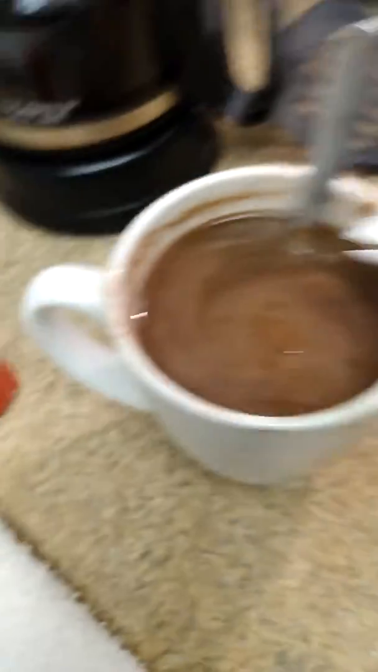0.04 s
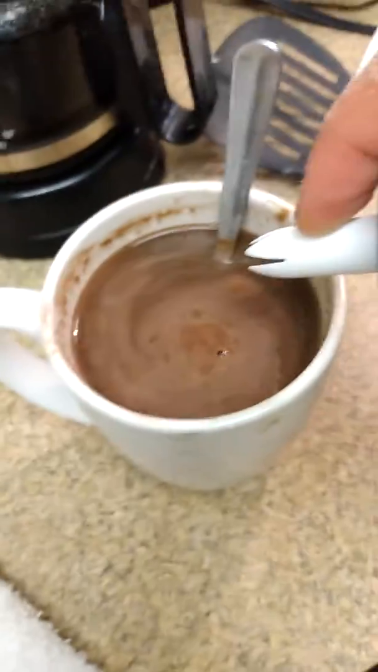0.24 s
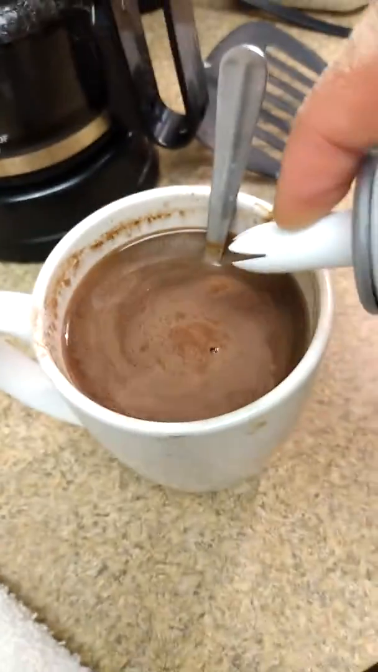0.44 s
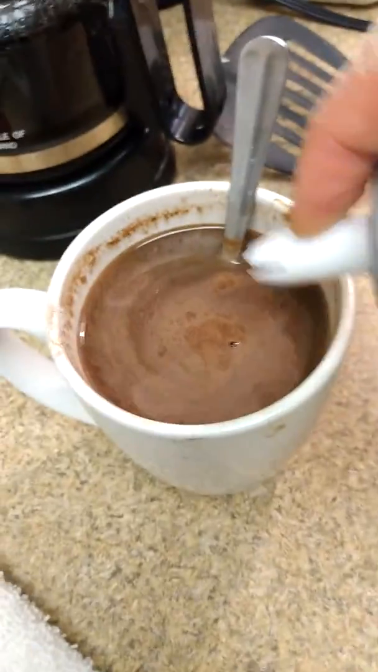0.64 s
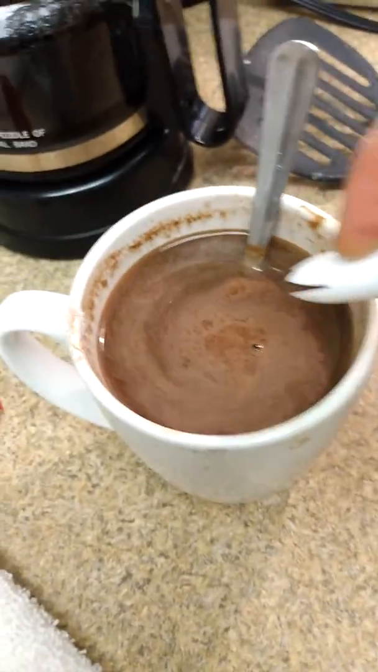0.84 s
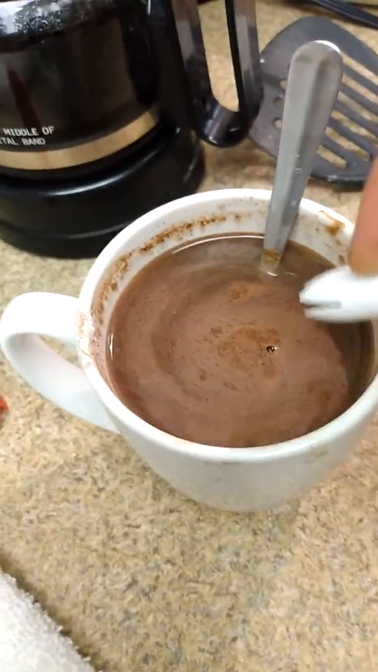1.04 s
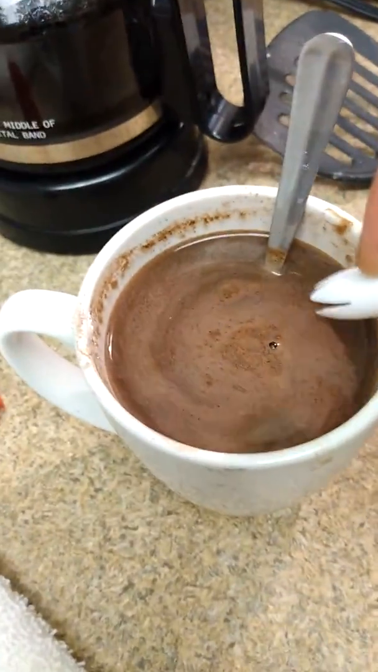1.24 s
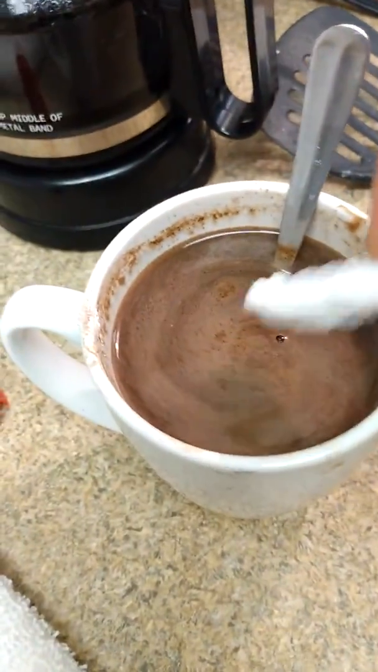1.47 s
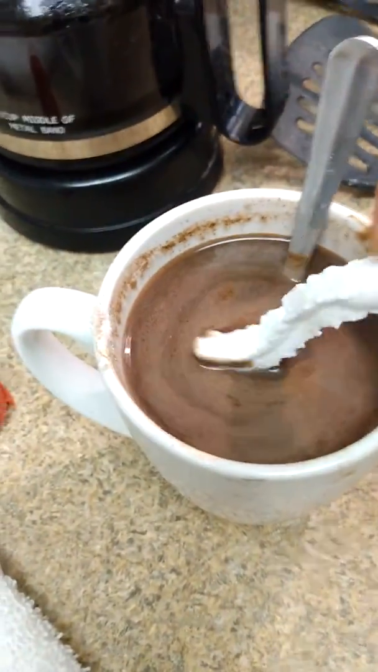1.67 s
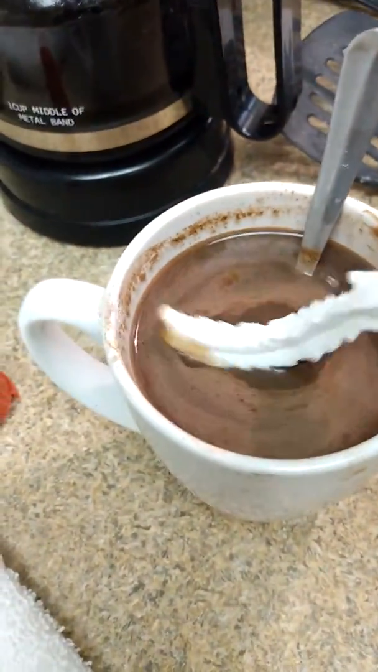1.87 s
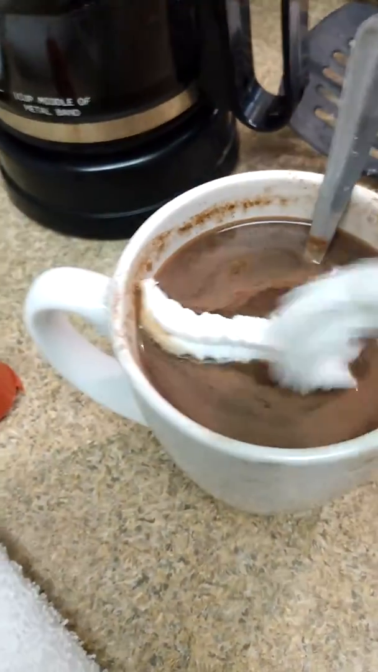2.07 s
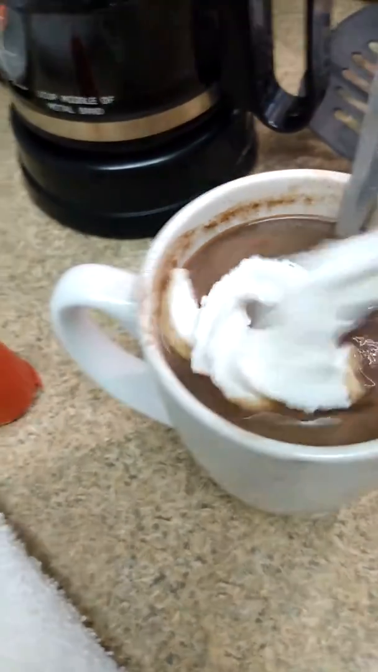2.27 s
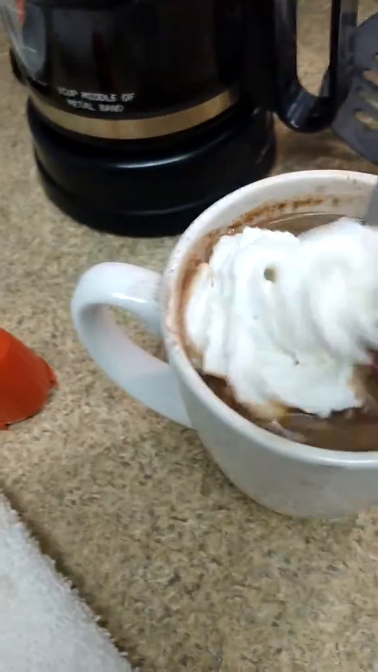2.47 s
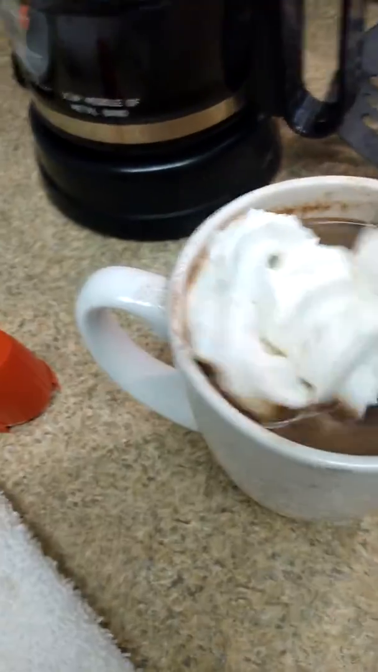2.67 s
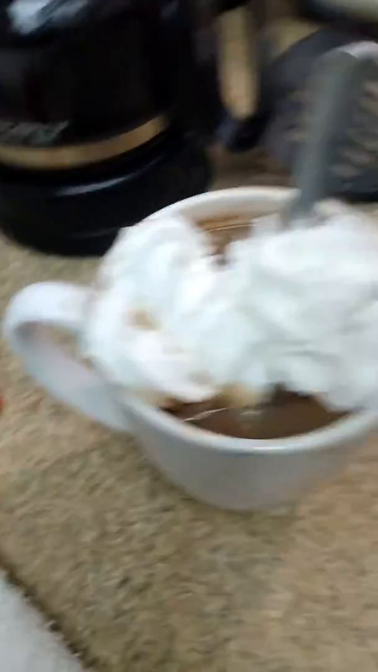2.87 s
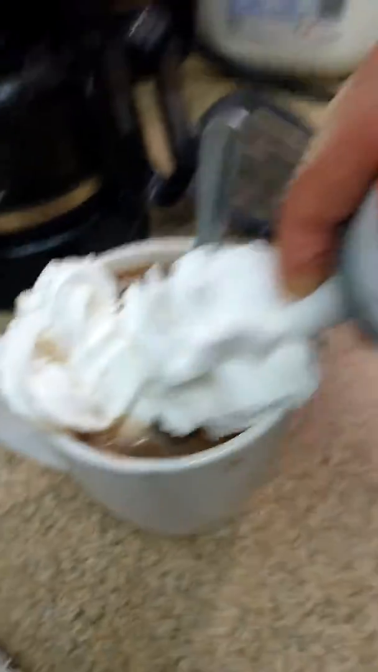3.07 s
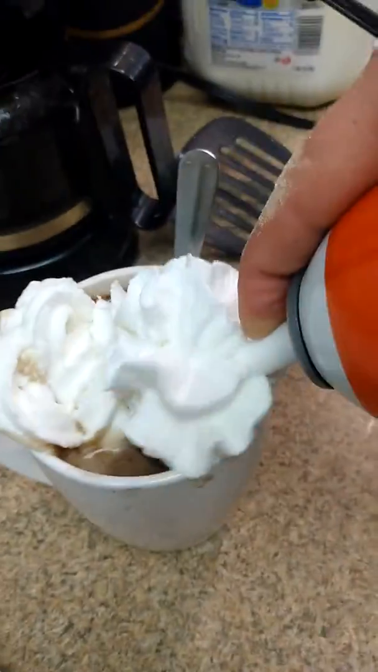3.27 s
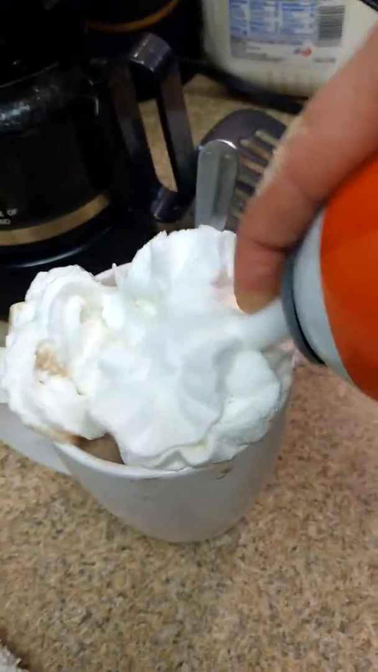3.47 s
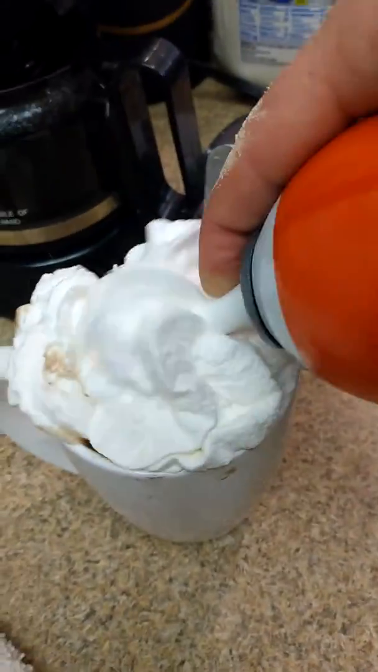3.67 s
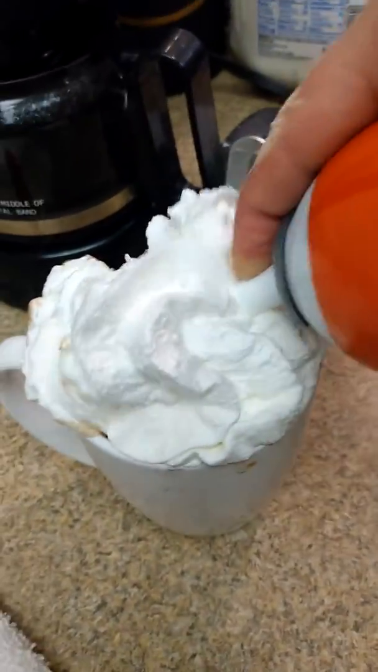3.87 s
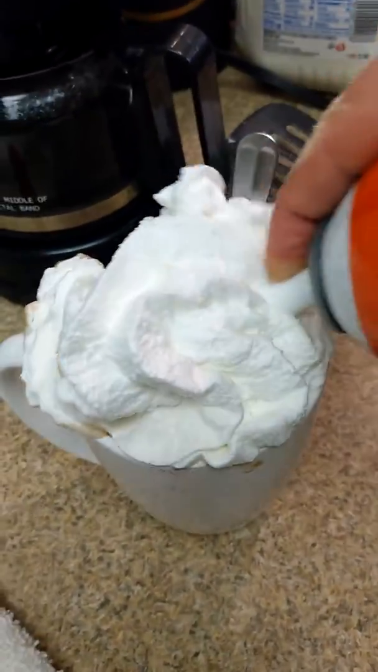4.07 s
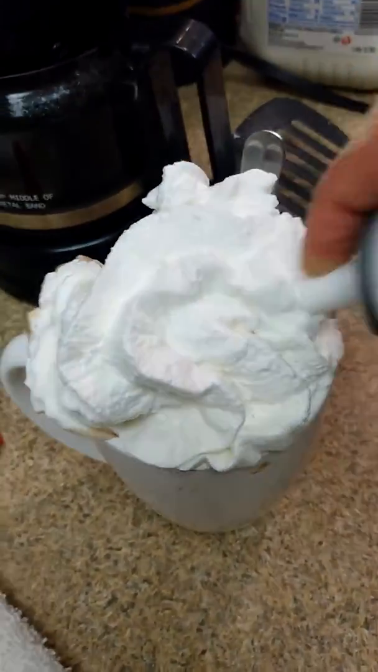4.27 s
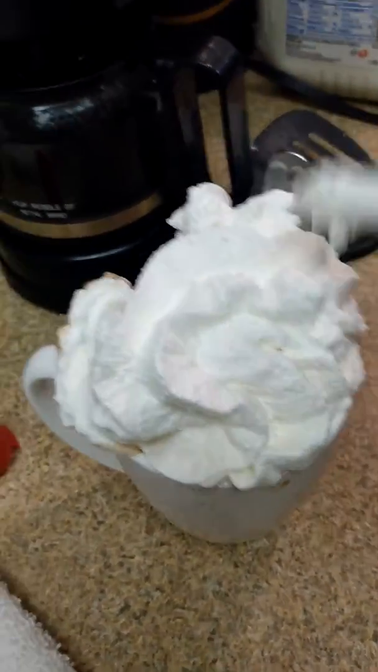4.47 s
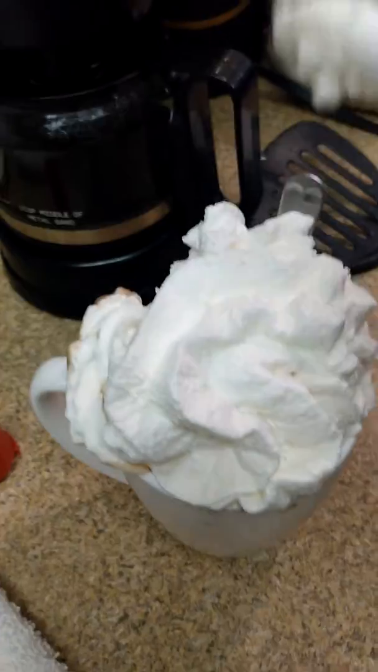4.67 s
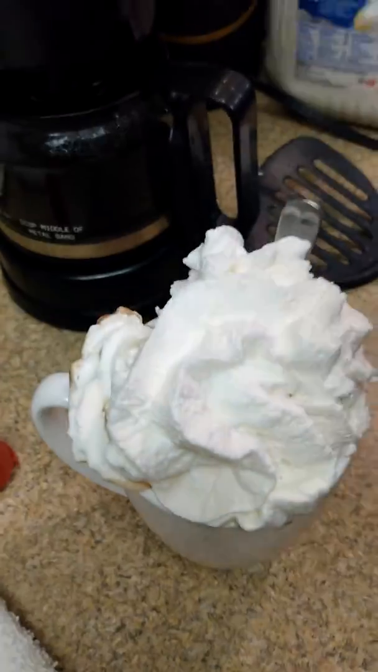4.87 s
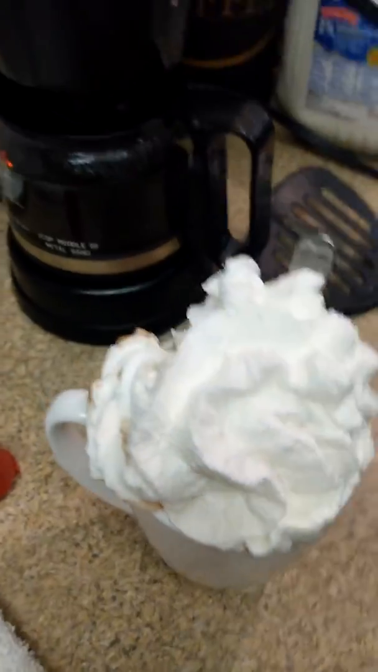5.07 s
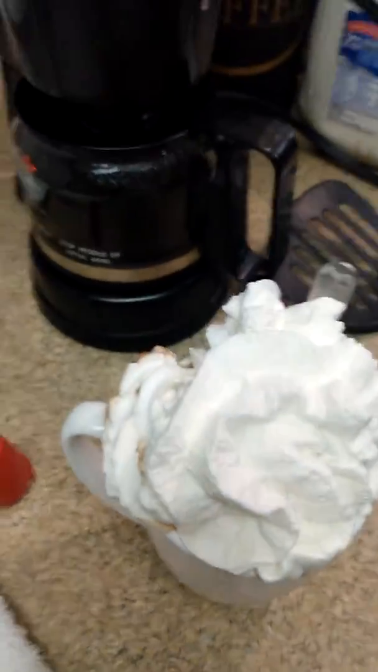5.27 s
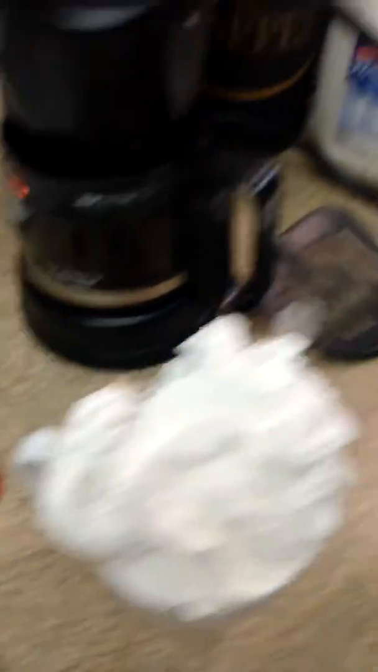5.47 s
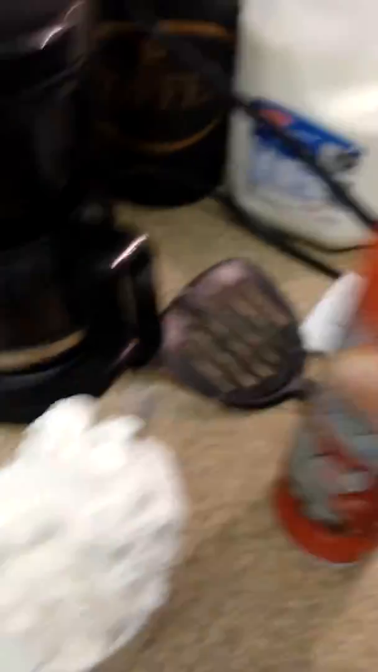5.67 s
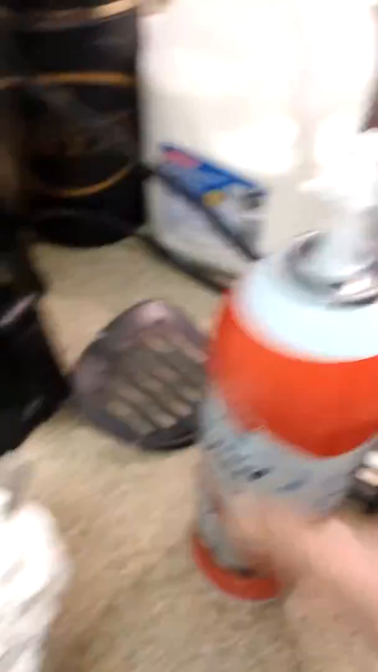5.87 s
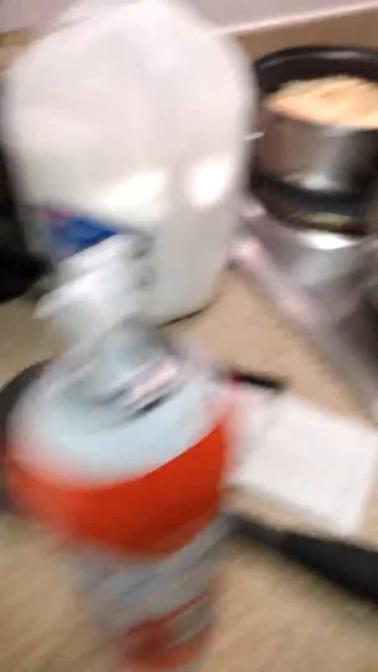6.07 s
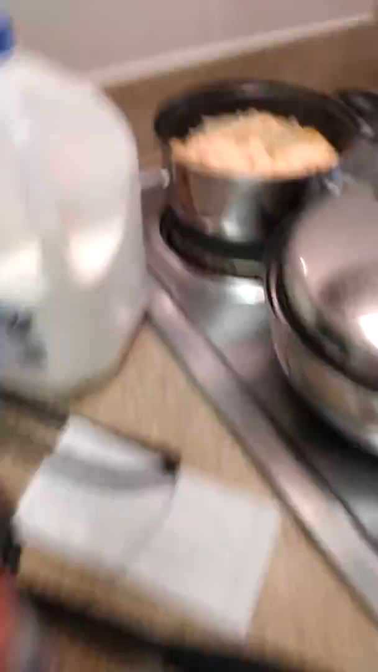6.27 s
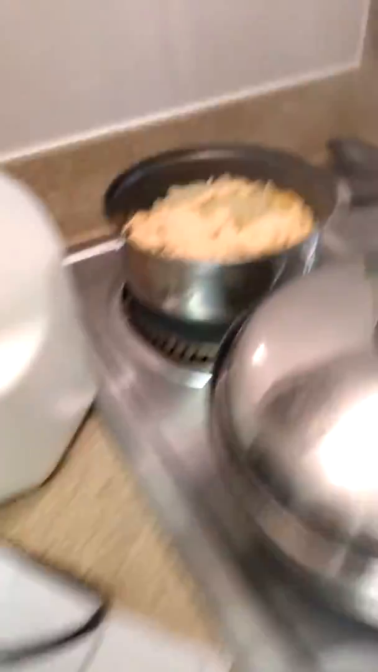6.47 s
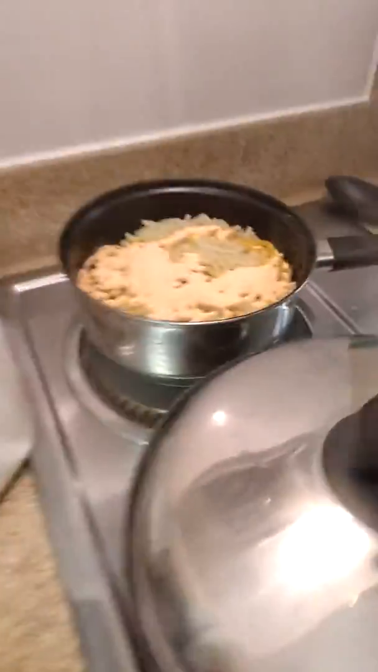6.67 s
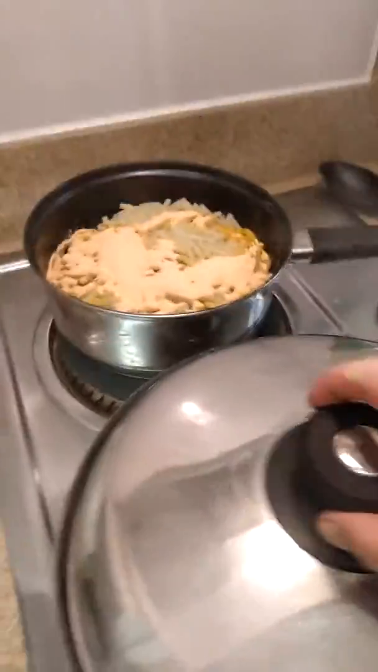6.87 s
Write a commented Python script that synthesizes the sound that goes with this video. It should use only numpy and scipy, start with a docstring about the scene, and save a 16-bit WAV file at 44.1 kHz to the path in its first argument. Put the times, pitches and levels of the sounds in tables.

```python
"""An appliance hums behind as fingers rub and bump an aerosol can of cream in a small kitchen.
The bent nozzle creaks, gas sputters, then foam hisses and crackles onto a mug and turns gassier: shaped noise.
Bursts of noise make the spits; moving resonances make the hollow gurgle of the cream.
A sleeve swishes in rubbed noise, then the can is set down and rocks: fading tones of can and counter.
Fingers brush the can again at the end. Two microphones of a hand-held phone hear it all."""
import sys
import numpy as np
from scipy import signal
from scipy.fft import rfft, irfft
from scipy.io import wavfile
from scipy.ndimage import uniform_filter1d

SR = 44100
rng = np.random.default_rng(int(sys.argv[2]) if len(sys.argv) > 2 else 0)


def transcribe(signal):
    """Save signal, clipped to [-1, 1], as a 16-bit WAV file at the path in sys.argv[1]."""
    frames = np.atleast_2d(signal).T
    limited = np.clip(frames, -1, 1)
    pcm = np.round(limited * 32767).astype(np.int16)
    wavfile.write(sys.argv[1], SR, pcm)


N = 306054
TIME = np.arange(N) / SR  # seconds
FREQS = np.maximum(np.arange(4097) * SR / 8192, 1)  # Hz, where every filter is drawn

# All levels are relative: mixing, echoes and filters still change them.

# Room tone. Each row: frequency in Hz, level in dB per Hz.
ROOM_TONE = [(25, -22.5), (60, -12), (85, -11), (110, 0), (160, -13.5), (215, -1), (300, -8.5), (450, -7),
             (620, -18.5), (1300, -22.5), (2100, -31.5), (3200, -35), (7500, -38), (16000, -39)]
# Appliance hum. Each row: frequency in Hz, level in dB.
HUM = [(101, -85), (120, -75.5), (241, -86.5)]
KITCHEN_T60_S = 0.28  # time for the room's tail to fall by 60 dB
# Typical delays of the echoes off mug, counter and coffee pot, in seconds.
ECHO_S = [0.000703, 0.0013, .0031]
TOP_HZ = 15950  # the phone keeps almost nothing above this

# The can lands and rocks on its rim. Each row: start in seconds, clunk of the can in dB,
# brightness of the contact in Hz, thud of the counter in dB.
KNOCKS = [(5.492, -8.5, 2570, -3), (5.4965, -6.5, 480, 0), (5.5093, -14.5, 2020, -6),
          (5.5222, -24, 2400, -20), (5.655, -10.5, 3180, -2), (5.6603, -18.5, 1500, -19),
          (5.6715, -22, 2000, -19), (5.688, -22.5, 1300, -12.5), (5.777, -23.5, 1800, -14),
          (5.783, -16, 460, -13), (5.931, -45, 700, -23), (5.939, -34.5, 1100, -26),
          (5.965, -34, 646, -29.5), (6.008, -45.5, 517, -45)]
# Short tones of the can's base, damped by the cream. Each row: pitch in Hz, level in dB,
# time to fall by 60 dB in seconds.
CAN_BASE = [(409, 1, 0.039), (742, 1.5, 0.027), (990, -6, .035), (1216, -11, 0.039), (1490, -11.5, 0.042),
            (1700, -11, .03), (2070, -14.5, 0.035), (3470, -26, 0.073), (3904, -22, 0.078)]
# Tones of the counter with the can on it. Each row: pitch in Hz, level in dB,
# time to fall by 60 dB in seconds.
COUNTER = [(102, -25, 0.2), (124.4, -23.5, 0.24), (206, -21.5, .24), (257, -23, 0.34), (324.5, -22.5, 0.23),
           (393, -32.5, 0.21), (432.5, -23, 0.36), (590, -34, 0.208), (720, -33.5, .18), (745, -31.5, .2),
           (800, -35.5, .18), (980, -26, 0.099), (1075, -42, .2), (1285, -37, .19), (1460, -37, 0.18),
           (1686, -40.5, .17), (1790, -41.5, .2), (2145, -40.5, .18)]
# Spectrum of the short rattle of each knock. Each row: frequency in Hz, level in dB.
CLATTER = [(25, -30.5), (60, -17.5), (110, -2), (160, -8), (220, 1.5), (400, -6), (540, -9), (780, -8.5),
           (1200, -17.5), (1800, -24.5), (2600, -27), (4500, -30), (8000, -41), (16000, -47.5)]
# how fast the rim bites, and how slowly the counter takes up the blow
CONTACT_S, COUNTER_SWELL_S = 0.0012, .005
# spread of tone level (dB) and pitch (share) between touches, and unevenness of the rattle (dB)
STRIKE_SCATTER_DB, STRIKE_DETUNE, RATTLE_DB = 1.5, .012, 3

# The hand bumps and shifts on the can. Each row: start in seconds, level in dB, length in seconds,
# brightness of the contact in Hz, thump of the palm in dB.
BUMPS = [(0.317, -39.5, 0.0043, 1300, -1), (0.333, -35, 0.0089, 1490, -7),
         (0.362, -44.5, 0.0076, 2200, -12), (0.389, -42, 0.0068, 1800, -12),
         (0.424, -46.5, 0.0061, 2000, -10), (0.437, -43.5, 0.0087, 500, -7), (0.49, -54, 0.013, 447, -22),
         (0.53, -61.5, 0.049, 300, -32), (0.663, -53, 0.008, 500, -27), (0.68, -41.5, 0.0093, 2980, -16),
         (0.956, -53, 0.011, 1100, -32), (1.006, -53, 0.0063, 250, -25)]
# Hollow resonances of the can in the hand. Each row: centre in Hz, width in Hz, level in dB.
CAN_BODY = [(474, 60, 6), (594, 44, -11.5), (720, 56, -4), (883, 51, 0.5), (1005, 32, -1.5),
            (1490, 150, -10.5), (1800, 64, -3.5), (1230, 1900, -11)]
PALM_HZ, PALM_WIDTH_HZ = 306, 166  # the dull thump of the palm
# unevenness of the bumping and bending fingers (dB), and how far a bump retunes the can (share of pitch)
JUDDER_DB, BUMP_DETUNE = 5, .025
# Cream squelches in the can and on the mound. Each row: start in seconds, level in dB,
# length in seconds, centre in Hz, width in Hz.
SQUELCHES = [(1.937, -55, 0.026, 333, 128), (1.99, -45.5, 0.008, 980, 980), (3.341, -44, 0.029, 563, 198),
             (3.409, -52.5, 0.022, 205, 90.5), (4.266, -60, 0.025, 300, 140),
             (4.475, -46.5, 0.0089, 700, 160)]
# Clicks and scuffs of the valve, fingers and things in reach. Each row: start in seconds, level in dB,
# length in seconds, centre in Hz, width in Hz.
TICKS = [(0.33, -34.5, 0.0031, 8300, 9400), (0.582, -54.5, 0.0016, 7060, 8860),
         (1.239, -23.5, 0.0026, 14000, 4000), (4.554, -53, 0.0058, 3600, 4000),
         (4.651, -46, 0.0021, 8800, 11300), (4.833, -50, 0.0043, 7900, 7000),
         (4.92, -41.5, 0.0055, 6600, 7140), (4.921, -47, 0.029, 1250, 1100),
         (5.209, -52.5, 0.0032, 7500, 4830), (5.296, -47, 0.0018, 9200, 3900),
         (5.491, -38, 0.0015, 7000, 9000), (5.508, -43, .0015, 8000, 8000),
         (5.638, -51, 0.0057, 3100, 2200), (5.655, -39, 0.0014, 6000, 8000),
         (5.673, -36, 0.00081, 8000, 8000), (5.778, -37.5, 0.0021, 6000, 8200),
         (5.817, -53.5, 0.038, 3270, 2400), (5.879, -43, .001, 8000, 7000),
         (5.936, -40, 0.00068, 8060, 7070), (6.156, -53, 0.0022, 6650, 6050), (6.37, -63, .009, 4500, 2500),
         (6.525, -58, 0.028, 680, 91), (6.631, -45.5, 0.019, 4590, 4400)]
# The finger bends the nozzle before the valve opens. Each row: time in seconds,
# level of the creak in dB, strain as a share of pitch.
BEND = [(1.101, -72, -.09), (1.112, -51, -0.073), (1.17, -49.5, 0), (1.225, -56.5, 0.024),
        (1.29, -71, 0.091)]
# Resonances of the bent nozzle. Each row: centre in Hz, width in Hz, level in dB.
BENT_NOZZLE = [(481, 56, 1.5), (664, 134, -2.5), (930, 230, -14), (1100, 80, -4)]
CREAK_LAG_S_PER_HZ = .00005  # higher resonances join later

# Fingers slide on metal. Each row: peak time in seconds, swell in seconds, fade in seconds,
# swish in dB, scrape in dB.
FINGER_STROKES = [(0.01, 0.09, 0.52, -73.5, -76.5), (0.34, 0.082, 0.15, -43, -54),
                  (0.71, 0.1, 0.088, -50, -69), (0.84, 0.55, 0.3, -74, -60),
                  (0.99, 0.19, 0.094, -55.5, -57.5), (1.21, 0.22, 0.36, -54.5, -57),
                  (5.86, 0.38, 0.23, -55, -57.5), (6.14, 0.084, .12, -71, -68.5),
                  (6.215, 0.06, 0.048, -56.5, -73), (6.66, 0.2, 0.29, -62.5, -62)]
# The sleeve brushes past. Each row: peak time in seconds, swell in seconds, fade in seconds,
# swish in dB, rasp in dB.
SLEEVE_STROKES = [(4.46, 0.036, 0.17, -53, -79), (4.655, 0.0065, 0.027, -65, -92),
                  (4.856, 0.035, 0.3, -48.5, -61), (4.935, 0.058, 0.14, -40, -44.5),
                  (5.18, 0.1, 0.19, -62, -95), (5.315, 0.035, 0.12, -65, -92.5),
                  (5.445, 0.035, 0.048, -69.5, -87), (6.47, 0.17, 0.42, -54, -75)]
# a stroke drops this much over its swell or fade time, ever faster away from the peak
STROKE_RANGE_DB, STROKE_CURVE = 25, 1.67
# Spectrum of the rubbing cloth. Each row: frequency in Hz, level in dB.
SWISH = [(2000, -58), (3600, -9), (5000, -1), (6600, -1), (9500, 1), (12000, -1), (16000, -12)]
# Resonances of the can's wall under the fingers. Each row: centre in Hz, width in Hz, level in dB.
SCRAPE = [(1747, 150, -11), (1978, 120, -2), (2203, 86, 0.5), (2400, 300, -9), (2980, 390, -7.5)]
# shifting fingers damp and retune the wall: level spread, share of pitch, changes per second
GRIP_DB, GRIP_SHARE, GRIP_PER_S = 3, .012, 9

# First gas through the empty nozzle. Each row: start in seconds, level in dB, length in seconds.
SPUTTER = [(1.2383, -27.5, 0.0023), (1.25, -40, 0.0007), (1.25, -27.5, 0.0028), (1.2646, -34.5, 0.0019),
           (1.269, -35, 0.0037), (1.281, -30.5, 0.004), (1.2905, -20.5, 0.00032), (1.292, -29, 0.0025),
           (1.301, -25.5, 0.0016), (1.307, -26, 0.0034), (1.3253, -39, 0.0007), (1.328, -29.5, 0.00065),
           (1.335, -31, 0.00063)]
# Resonances of the empty nozzle. Each row: centre in Hz, width in Hz, level in dB.
NOZZLE = [(1250, 710, -4), (1964, 280, 1), (3730, 490, 9), (4700, 600, 7.5), (6610, 770, 13.5),
          (11200, 2800, -2.5), (11900, 450, -9), (14000, 700, -10)]
# Flow through the valve, eased off once and pressed again. Each row: time in seconds,
# level of the spray in dB.
FLOW = [(1.332, -37.5), (1.36, -46), (1.43, -46.5), (1.5, -45.5), (1.646, -47), (1.69, -64), (1.82, -65),
        (1.93, -59.5), (2.05, -47.5), (2.45, -41), (2.87, -41), (3.05, -39), (3.32, -42), (4.37, -42),
        (4.42, -73)]
FULL_FLOW_DB = -45
# How much of the jet is free gas. Each row: time in seconds, smooth gas compared with bursting foam
# in dB, rush of the gas compared with the hiss in dB.
GAS = [(1.33, -21, -11), (1.5, 3, -14.5), (1.8, -42, -84), (2.15, -15, -19.5), (2.5, 2, -13),
       (3.1, 2.5, -5), (3.7, -2.5, -6.5), (4.35, 0.5, -5.5)]
# Spectrum of the foam's hiss. Each row: frequency in Hz, level in dB.
HISS = [(300, -74), (1500, -22.5), (3000, -32), (3900, -1), (5000, -1.5), (5900, 0.5), (6900, 3),
        (8200, 4.5), (9200, 1.5), (10700, 4.5), (12500, 1.5), (16000, -2.5)]
# Upper hiss, which swells as the jet spreads and drowns the slots. Each row: time in seconds,
# level in dB.
SIZZLE = [(1.35, -9), (2.1, -4), (2.7, -13.5), (3.1, -1.5), (3.45, -6), (3.9, -12.5), (4.35, -7)]
SIZZLE_HZ, SIZZLE_WIDTH_HZ = 9500, 3200
# the slots of the nozzle's tip sing, and stand out more at low flow
SLOTS_HZ, SLOTS_WIDTH_HZ, SLOTS_DB, SLOTS_DB_PER_DB = 6916, 690, -3.5, 0.3565
# Resonances of the cream-filled throat. Each row: centre in Hz, width in Hz, level in dB.
THROAT = [(1203, 274, 0), (1500, 325, 0), (1800, 346, 1.5)]
# the throat weakens below full flow, and is muffled once the cream piles up around it
THROAT_DB, THROAT_DB_PER_DB, BURIED_S, MUFFLE_DB_PER_S = -5.5, 1.1, 3.55, 10
# Gas blowing into the growing mound. Each row: time in seconds, level of its hollow in dB,
# pitch of the hollow in Hz.
HOLLOW = [(1.35, -13, 684), (1.6, -32, 700), (2.25, -22.5, 720), (2.8, -16, 700), (3.0, -9, 660),
          (3.36, -4.5, 656), (3.6, -9.5, 598), (3.8, -9, 696), (4.1, -9, 595), (4.35, -17, 664)]
# Resonances of the hollow in the cream. Each row: multiple of its pitch, width in Hz, level in dB.
HOLLOW_MODES = [(1, 306, -2), (1.499, 420, 0.5), (2.2, 800, -0.5)]
OPEN_HOLLOW_HZ = 698  # the throat has its listed pitches when the hollow has this one
# wet cream makes throat and hollow gurgle: depth, changes per second
GURGLE_DB, GURGLE_PER_S = 2.2, 57
# passing cream retunes them: share of pitch, changes per second
WANDER_SHARE, WANDER_PER_S = .045, 14
# Gas pockets, strong and weak, that burst at the nozzle at set times. Each row: start in seconds,
# level in dB.
SPITS = [(1.3618, -24), (1.4052, -20), (1.4864, -12.5), (1.5199, -19), (1.5693, -16), (1.6002, -27),
         (1.6187, -17.5), (1.636, -31), (1.7349, -24.5), (1.8517, -31.5), (1.876, -28), (1.937, -23.5),
         (1.957, -25.5), (1.977, -29), (2.0782, -20.5), (2.153, -28), (2.1655, -17), (2.2213, -17),
         (2.2513, -18), (2.2665, -26), (2.568, -14.5), (2.973, -11.5), (3.83, -21), (3.8784, -15.5),
         (4.047, -17)]
# pockets at random times: level over the flow before the spits' shared cut, and its weakening with time
POCKET_DB, POCKET_FADE_DB_PER_S = 15, 4.5
POCKETS_PER_S, POCKET_SCATTER_DB = 90, 5  # average rate, spread either way
# Place of the nozzle. Each row: time in seconds, left minus right in dB (before the phone's shading).
AIM = [(1.35, 3), (1.6, 5.5), (2.4, 5.5), (3.1, 3), (4.3, 2.5)]
# The phone's body shades the right microphone from the nozzle. Each row: frequency in Hz, level in dB.
SHADE = [(350, 6.5), (700, 8), (1300, -1), (8000, 0), (11000, -1), (15000, -2)]
PORT_LAG_S = .000185  # the spray reaches the right microphone about this much later
JET_ALIKE_HZ = 6000  # the close jet sounds alike at both microphones below this


def undb(db):
    """Turn decibels into a gain."""
    return 10 ** (np.asarray(db) / 20)


def unit(x):
    """Scale a sound to an average (rms) level of 1."""
    return x / np.sqrt(np.mean(x ** 2))


def curves(table):
    """Draw each column of a table as a line through time."""
    s, *columns = np.transpose(table)
    return [np.interp(TIME, s, c) for c in columns]


def during(table, fade=0.019):
    """Give 1 while a table lasts, fading outside it."""
    inside = np.minimum(TIME - table[0][0], table[-1][0] - TIME)
    return np.clip(1 + inside / fade, 0, 1)


def convolve(x, response):
    """Pass a mono or stereo sound through an impulse response."""
    if x.ndim == 2:
        response = np.atleast_2d(response)
    return signal.oaconvolve(x, response, axes=-1)[..., :x.shape[-1]]


def shaped(x, gain):
    """Filter with the given gain at FREQS, without any sound arriving early (minimum phase)."""
    cepstrum = irfft(np.log(gain + 1e-6))
    half = len(gain) - 1
    fold = np.r_[1, np.full(half - 1, 2), 1, np.zeros(half - 1)]
    return convolve(x, irfft(np.exp(rfft(cepstrum * fold))))


def colour(x, points):
    """Filter by a spectrum of (Hz, dB) points."""
    hz, db = np.transpose(points)
    return shaped(x, undb(np.interp(np.log(FREQS), np.log(hz), db)))


def peak(hz, width):
    """Gain of a steep-sided resonance."""
    return 1 / (1 + ((FREQS ** 2 - hz ** 2) / (FREQS * width * np.pi / 2)) ** 2)


def resonate(x, hz, width):
    """Pass a sound through a steep resonance whose centre may move; rms 1."""
    turn = np.exp(2j * np.pi * np.cumsum(hz) / SR)
    band = signal.butter(3, width / 2, fs=SR, output="sos")
    # shift the centre down to zero, keep what is near it, shift back
    return unit((signal.sosfilt(band, x * turn.conj()) * turn).real)


def noise(size=N):
    """White noise."""
    return rng.standard_normal(size)


def walk(rate, size=N):
    """Smooth random wander with average (rms) size 1."""
    k = max(int(SR / rate), 1)
    steps = np.repeat(noise(size // k + 1), k)
    return unit(uniform_filter1d(steps, k)[:size])


def grains(rate, spread_db):
    """Tiny clicks at random moments, a few much larger than the rest."""
    size = undb(spread_db * np.minimum(rng.exponential(size=N), 4))
    return unit((rng.random(N) < rate / SR) * size * np.sign(noise()))


def diffuse(size, alike_hz=480):
    """Noise scattered by the things on the counter: most alike at the two microphones in the bass."""
    alike = .95 / (1 + (FREQS / alike_hz) ** 3)
    mid = shaped(noise(size), np.sqrt((1 + alike) / 2))
    side = shaped(noise(size), np.sqrt((1 - alike) / 2))
    return np.array([mid + side, mid - side])


def puff(length, gain, rough_db=0, alike_hz=480):
    """A stereo noise burst that swells for `length` s and dies away; a rough one is broken up."""
    age = TIME[:SR // 4] / length
    swell = age * np.exp(1 - age)
    judder = undb(rough_db * walk(300, size=len(age)))
    burst = shaped(diffuse(len(age), alike_hz) * swell * judder, gain)
    return unit(burst) * np.sqrt(np.mean(swell ** 2))


def add(track, s, sound):
    """Mix a stereo sound into a track at time s."""
    i = int(s * SR)
    track[:, i:i + sound.shape[1]] += sound[:, :N - i]


def kitchen(x, room_db):
    """Add the short tail of the small room: noise that dies away."""
    t = TIME[:SR // 2]
    tail = diffuse(len(t)) * undb(-60 * t / KITCHEN_T60_S) * (t > .004)
    tail = unit(tail) / np.sqrt(len(t))
    return (x + undb(room_db) * convolve(x, tail)) / np.hypot(1, undb(room_db))


def glancing(x, echo_db, drift=0.043):
    """Nearby hard surfaces return echoes whose delays drift as the hand moves, combing the sound."""
    out = x.copy()
    for channel, sound in enumerate(x):
        for delay in ECHO_S:
            lag = delay * (rng.uniform(.8, 1.24) + drift * walk(1.2))
            out[channel] += undb(echo_db) * np.interp(TIME - lag, TIME, sound)
    return out / np.sqrt(1 + len(ECHO_S) * undb(echo_db) ** 2 / 2)


def room_tone():
    """Moving air is noise whose level wavers; the appliance hums in steady sine tones."""
    air = unit(colour(diffuse(N, alike_hz=800), ROOM_TONE)) * undb(-71.0 + 0.19 * walk(3.5))
    hum = sum(undb(db) * np.sqrt(2) * np.sin(2 * np.pi * hz * TIME) for hz, db in HUM)
    return air + hum


def ringing(modes, scatter_db, detune):
    """Fading tones as rows; each touch varies their levels and pitches at random, low pitches least."""
    t = TIME[:SR // 2]
    hz, db, t60 = np.transpose(modes)
    hz = hz * (1 + detune * hz / hz.max() * noise(len(hz)))
    db = db + scatter_db * noise(len(hz))
    sign = (-1) ** np.arange(len(hz))
    level = undb(db[:, None] - 60 * t / t60[:, None])
    return sign[:, None] * level * np.exp(2j * np.pi * hz[:, None] * t)


def heard(modes):
    """Struck tones at both microphones: short waves arrive out of step."""
    phase = noise((2, len(modes))) * (np.transpose(modes)[0] / 1500) ** 2
    return (np.exp(1j * phase) @ ringing(modes, STRIKE_SCATTER_DB, STRIKE_DETUNE)).imag


def knocks():
    """Each touch of the rim clunks the can and thuds the counter; a soft contact has less treble."""
    t = TIME[:SR // 2]
    out = np.zeros((2, N))
    swell = 1 - np.exp(-t / COUNTER_SWELL_S)
    for s, can_db, bright_hz, counter_db in KNOCKS:
        clunk = heard(CAN_BASE) * (1 - np.exp(-t / CONTACT_S))
        grit = unit(shaped(diffuse(len(t)), peak(1600, 1100))) * undb(-10.5 - 60 * t / 0.04)
        contact = shaped(clunk + grit, 1 / np.sqrt(1 + (FREQS / bright_hz) ** 6))
        rattle_db = -20 - 60 * t / 0.27 + RATTLE_DB * walk(130, size=len(t))
        rattle = unit(colour(diffuse(len(t)), CLATTER)) * undb(rattle_db)
        dulling = np.maximum(1 / np.hypot(1, FREQS / bright_hz), undb(-7))
        thud = shaped(swell * (heard(COUNTER) * undb(-1.0) + rattle), dulling)
        add(out, s, undb(can_db) * contact + undb(counter_db) * thud)
    return kitchen(out, room_db=-11)


def creak():
    """The nozzle sticks and slips as it is bent: its resonances rise with strain, higher ones join later."""
    s, db, strain = np.transpose(BEND)
    slips = undb(JUDDER_DB * walk(160))
    out = 0
    for hz, width, mode_db in BENT_NOZZLE:
        above = hz - BENT_NOZZLE[0][0]
        moment = TIME - CREAK_LAG_S_PER_HZ * above
        level_db = np.interp(moment, s, db, left=-np.inf, right=-np.inf)  # silent outside the bend
        pitch = hz + np.interp(TIME, s, strain) * np.sqrt(hz * max(above, 1))
        out = out + undb(level_db + mode_db) * resonate(slips * diffuse(N), pitch, width)
    return out


def held_can():
    """Hollow resonances of the can, retuned and rebalanced at random by each new grip."""
    body = 0
    for hz, width, mode_db in CAN_BODY:
        gain = undb(mode_db + GRIP_DB * rng.standard_normal())
        body = body + gain * peak(hz * (1 + BUMP_DETUNE * rng.standard_normal()), width) ** 2
    return body


def handling():
    """Bumps are noise through the can's body and the palm; squelches and clicks are noise in one band."""
    out = creak()
    for s, db, length, bright_hz, palm_db in BUMPS:
        palm = undb(palm_db) * peak(PALM_HZ, PALM_WIDTH_HZ) ** 2
        gain = (held_can() + palm) / (1 + (FREQS / bright_hz) ** 2)
        add(out, s, undb(db) * puff(length, gain, rough_db=JUDDER_DB))
    for s, db, length, hz, width in SQUELCHES + TICKS:
        add(out, s, undb(db) * puff(length, peak(hz, width) ** 2, rough_db=2.0))
    return kitchen(out, room_db=-5.0)


def strokes(table):
    """Gains of the two layers of a set of strokes, each of which swells and fades."""
    power = np.zeros((2, N))
    for s, swell, fade, *levels_db in table:
        away = np.clip(np.maximum((s - TIME) / swell, (TIME - s) / fade), 0, 10)
        shape = undb(-STROKE_RANGE_DB * away ** STROKE_CURVE)
        power += np.outer(undb(levels_db), shape) ** 2
    return np.sqrt(power)


def can_wall(friction):
    """Rubbing rings the can's wall; shifting fingers favour now one resonance and now another."""
    wall = 0
    for hz, width, db in SCRAPE:
        gain = undb(db + GRIP_DB * walk(GRIP_PER_S))
        pitch = hz * (1 + GRIP_SHARE * walk(GRIP_PER_S))
        wall = wall + gain * resonate(friction, pitch, width)
    return unit(wall)


def rubbing():
    """Cloth and skin slide in many tiny slips: fingers ring the can's wall, the sleeve only rasps."""
    slips = undb(1.8 * walk(20) + 3.0 * walk(70) + 1.2 * walk(700))
    swish = unit(colour(slips * diffuse(N), SWISH))
    friction = slips * diffuse(N)
    rasp = unit(shaped(friction, peak(2400, 2300) ** 2))
    out = 0
    for table, scrape in ((FINGER_STROKES, can_wall(friction)), (SLEEVE_STROKES, rasp)):
        swish_gain, scrape_gain = strokes(table)
        out = out + undb(1.5) * swish * swish_gain + scrape * scrape_gain
    return kitchen(glancing(out, echo_db=-6.5, drift=.12), room_db=-5.5)


def pockets(flow_db):
    """Gas pockets at random moments while the valve is open, following the flow: rows (s, dB)."""
    start, end = FLOW[0][0], FLOW[-1][0]
    chance = rng.random((320, 3))
    share = POCKETS_PER_S * (end - start) / len(chance)  # how many of the candidates burst
    rows = []
    for when, size, bursts in chance:
        if bursts < share:
            s = start + (end - start) * when
            level_db = flow_db[int(s * SR)] + POCKET_DB - POCKET_FADE_DB_PER_S * (s - start)
            rows.append((s, level_db + POCKET_SCATTER_DB * (2 * size - 1)))
    return rows


def jet_flow(gas_db):
    """Strength of the jet: bursting foam cells over smooth gas, throttled by clots of cream."""
    # each cell lets out a short gasp, which the mug and counter echo for a few milliseconds
    t = TIME[:1024]
    gasp = np.exp(-t / 0.00013) + undb(-56.0) * np.exp(-t / 0.0034)
    bursts = grains(rate=780, spread_db=4.0) ** 2
    foam = unit(np.sqrt(np.abs(convolve(bursts, gasp))))
    flow = np.hypot(foam, undb(gas_db)) / np.hypot(1, undb(gas_db))
    return flow * undb(1.2 * walk(110))


def nozzle_tip(flow, flow_db):
    """The tip's slots sing in a narrow band, drowned by a sizzle as the jet spreads."""
    (sizzle_db,) = curves(SIZZLE)
    slots = resonate(flow * diffuse(N), SLOTS_HZ * (1 + 0.035 * walk(2.8)), SLOTS_WIDTH_HZ)
    slots_db = SLOTS_DB - SLOTS_DB_PER_DB * (flow_db - FULL_FLOW_DB)
    sizzle = unit(shaped(flow * diffuse(N), peak(SIZZLE_HZ, SIZZLE_WIDTH_HZ) ** 2))
    drowned = 1 + 2 * undb(sizzle_db) ** 2
    return slots * undb(slots_db) / drowned + sizzle * undb(sizzle_db)


def cream_resonances(flow, flow_db):
    """Gas rings the cream-filled throat and the mound's hollow, which gurgle and shift in pitch together."""
    hollow_db, hollow_hz = curves(HOLLOW)
    wet = flow * undb(GURGLE_DB * walk(GURGLE_PER_S))

    def gurgle(hz, width):
        """Noise of the flow through one resonance that passing cream keeps retuning."""
        pitch = hz * (1 + WANDER_SHARE * walk(WANDER_PER_S))
        return resonate(wet * diffuse(N, alike_hz=2200), pitch, width)

    pitch_ratio = hollow_hz / OPEN_HOLLOW_HZ
    throat = unit(sum(undb(db) * gurgle(hz * pitch_ratio, width) for hz, width, db in THROAT))
    hollow = unit(sum(undb(db) * gurgle(ratio * hollow_hz, width) for ratio, width, db in HOLLOW_MODES))
    throat_db = THROAT_DB + THROAT_DB_PER_DB * np.minimum(flow_db - FULL_FLOW_DB, 0)
    throat_db = throat_db - MUFFLE_DB_PER_S * np.maximum(TIME - BURIED_S, 0)
    return throat * undb(throat_db) + hollow * undb(hollow_db)


def add_spits(out, flow_db):
    """Gas pockets burst at the nozzle as very short puffs of treble."""
    spit = (peak(6700, 1500) + 0.87 * peak(8100, 4300)) / np.sqrt(1 + (3900 / FREQS) ** 10)
    gasps = [puff(0.00055, spit, alike_hz=JET_ALIKE_HZ) for _ in range(8)]
    for k, (s, db) in enumerate(SPITS + pockets(flow_db)):
        add(out, s, undb(db - 12) * gasps[k % len(gasps)])


def add_sputter(out):
    """The first gas rings the empty nozzle in rough puffs."""
    nozzle = sum(undb(db) * peak(hz, width) for hz, width, db in NOZZLE)
    for s, db, length in SPUTTER:
        add(out, s, undb(db) * puff(length, nozzle, rough_db=3.0))


def spray():
    """Foam cells burst over a smooth jet of gas; both ring the nozzle and the hollow in the cream."""
    (flow_db,), (pan_db,) = curves(FLOW), curves(AIM)
    gas_db, rush_db = curves(GAS)
    flow = jet_flow(gas_db)
    hiss = unit(colour(flow * diffuse(N, alike_hz=JET_ALIKE_HZ), HISS))
    rush = unit(shaped(flow * diffuse(N, alike_hz=JET_ALIKE_HZ), peak(2690, 2870) ** 2))
    out = (hiss + undb(rush_db) * rush) * undb(3.5)
    out = out + nozzle_tip(flow, flow_db) + cream_resonances(flow, flow_db)
    out = out * undb(flow_db) * during(FLOW)
    add_spits(out, flow_db)
    add_sputter(out)
    out = kitchen(glancing(out, echo_db=-15.0, drift=0.127), room_db=-6)
    left, right = out * undb(np.array([pan_db, -pan_db]) / 2)
    lag = PORT_LAG_S * (1 + 0.14 * walk(4))
    return np.array([left, colour(np.interp(TIME - lag, TIME, right), SHADE)])


def scene():
    """Everything at the two microphones."""
    return room_tone() + knocks() + handling() + rubbing() + spray()


def record(dry):
    """The phone thins the deep bass, rounds the loudest peaks and cuts the top."""
    thin = signal.sosfilt(signal.butter(2, 62, "highpass", fs=SR, output="sos"), dry)
    rounded = np.tanh(1.2 * thin) / 1.2
    return signal.sosfilt(signal.ellip(10, .2, 80, TOP_HZ, fs=SR, output="sos"), rounded)


dry = scene()
out = record(dry)
transcribe(out)
```